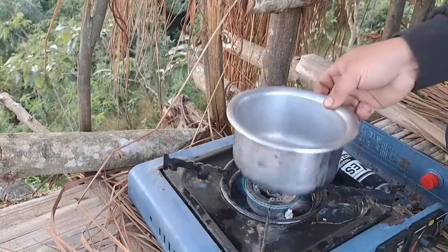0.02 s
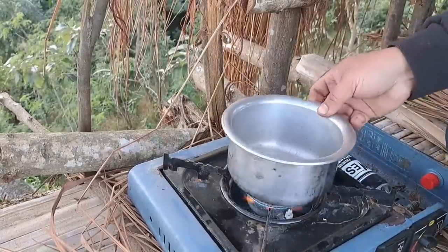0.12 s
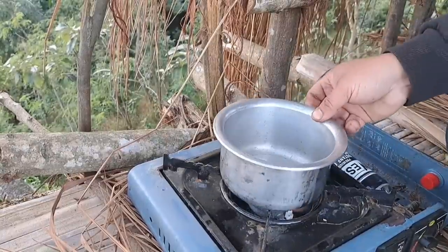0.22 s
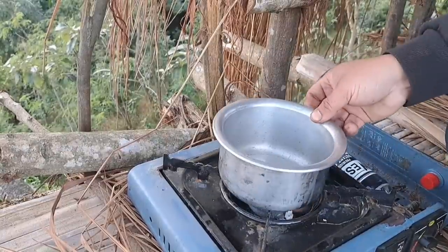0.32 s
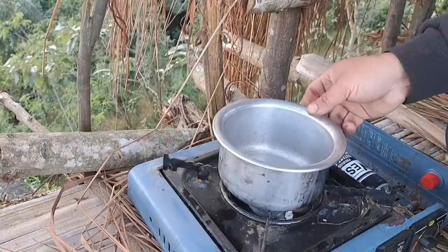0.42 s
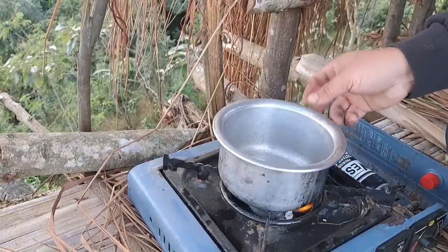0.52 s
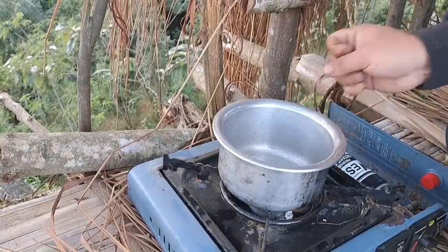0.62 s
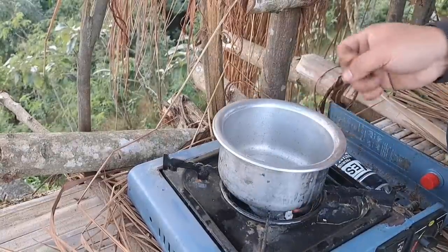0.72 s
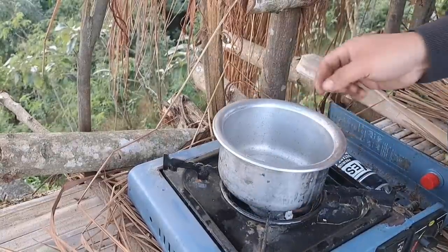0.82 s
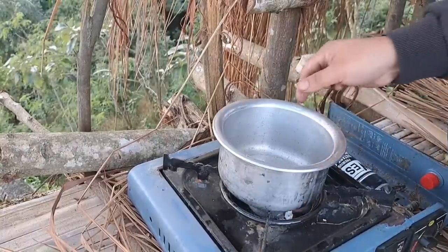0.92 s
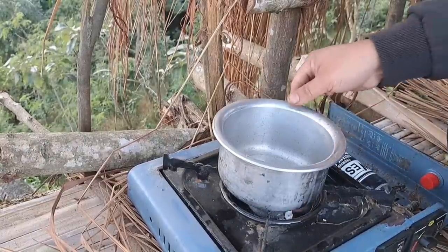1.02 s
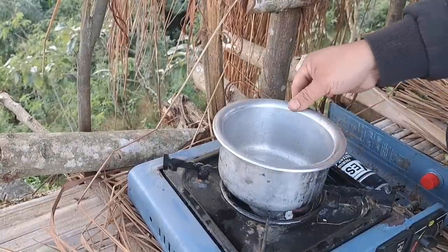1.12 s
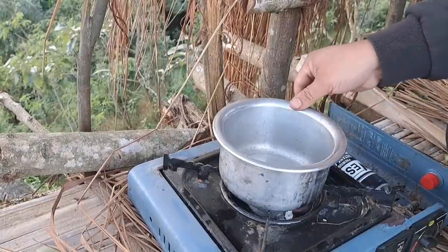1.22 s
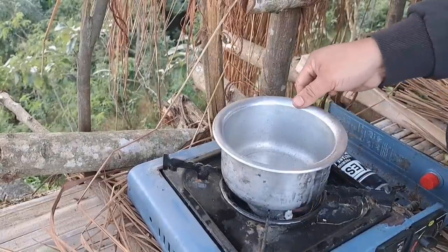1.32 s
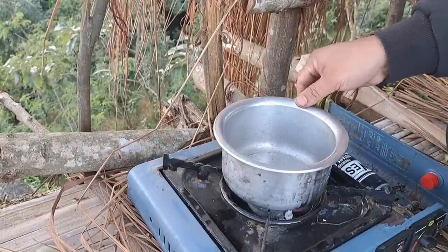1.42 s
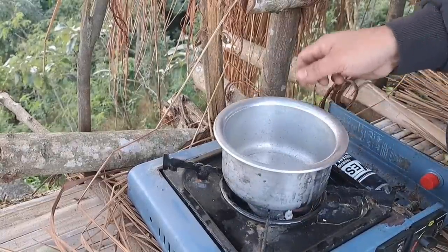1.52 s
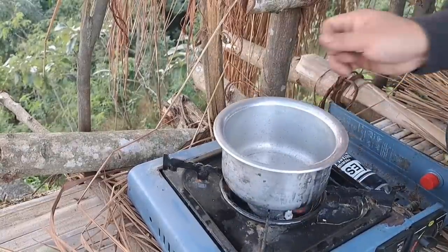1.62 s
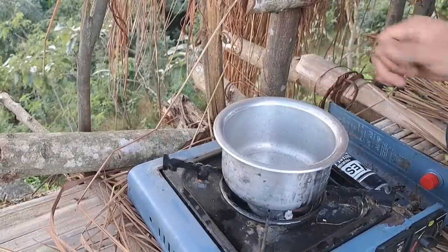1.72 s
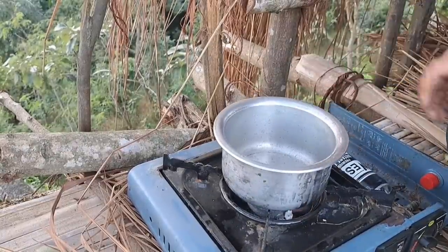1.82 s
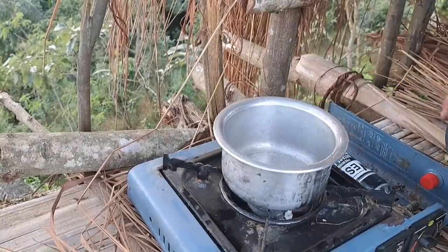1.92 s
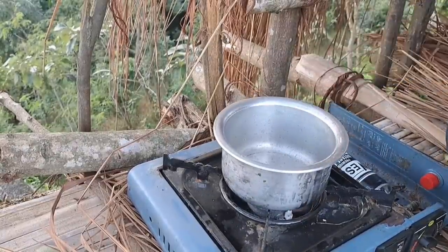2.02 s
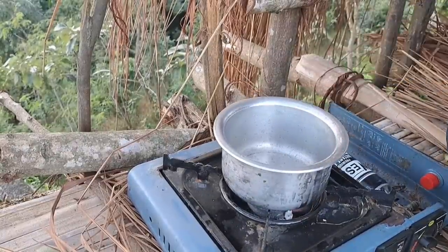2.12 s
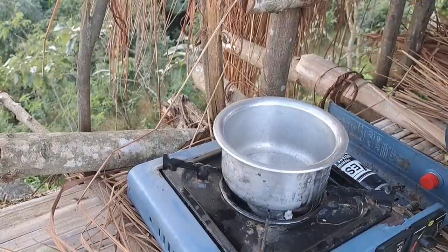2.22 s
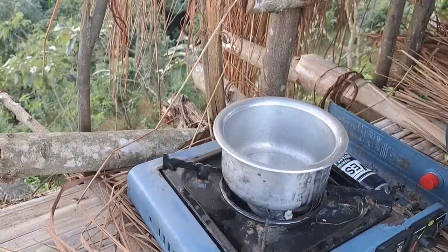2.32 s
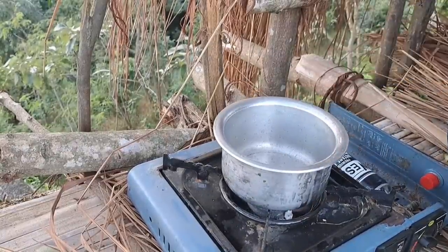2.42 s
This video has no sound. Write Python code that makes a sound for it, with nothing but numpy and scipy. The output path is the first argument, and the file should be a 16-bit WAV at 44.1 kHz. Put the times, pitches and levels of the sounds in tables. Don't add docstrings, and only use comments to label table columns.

```python
import sys
import numpy as np
from scipy import signal
from scipy.fft import rfft, irfft
from scipy.io import wavfile
from scipy.ndimage import uniform_filter1d

SR = 44100
rng = np.random.default_rng(int(sys.argv[2]) if len(sys.argv) > 2 else 0)


def put_to_file(sound):
    columns = np.atleast_2d(sound).T
    safe = np.clip(columns, -1, 1)
    whole_steps = np.round(safe * 32767)
    wavfile.write(sys.argv[1], SR, whole_steps.astype(np.int16))


def voltage_ratio(level):
    return 10 ** (np.asarray(level, float) / 20)


N = 110250


def unit(x):
    return x / np.sqrt(np.mean(x ** 2))


def curve(rows):
    return np.interp(np.arange(N) / SR, *np.array(rows).T)


def colour(x, points):
    log_hz = np.log(np.maximum(np.arange(2049) * SR / 4096, 5))
    point_hz, point_db = np.array(points).T
    log_gain = np.interp(log_hz, np.log(point_hz), point_db) * np.log(10) / 20
    cepstrum = irfft(log_gain)
    cepstrum[1:2048] *= 2
    cepstrum[2049:] = 0
    kernel = irfft(np.exp(rfft(cepstrum)))
    if x.ndim > 1:
        kernel = kernel[None]
    return signal.fftconvolve(x, kernel)[..., :x.shape[-1]]


def band(x, hz, width):
    return signal.lfilter(*signal.iirpeak(hz, hz / width, fs=SR), x)


def walk(rate):
    hold = int(SR / rate)
    steps = np.repeat(rng.standard_normal(N // hold + 1), hold)
    smooth = uniform_filter1d(uniform_filter1d(steps, hold), hold)
    return unit(smooth[:N])


def wide(alike):
    alike = np.clip(alike, 0, 1)
    mid, side = rng.standard_normal((2, N))
    return np.sqrt(1 + alike) * mid + np.sqrt(1 - alike) * side * np.array([[1], [-1]])


def pan(db):
    return voltage_ratio(np.array([[db], [-db]]) / 2)


# start in seconds, peak level in dB, contact softness in ms, left over right in dB.
HELD_CONTACTS = [(.2128, -22, 0.097, -11), (.2142, -21, 0.032, -3), (.217, -26.5, .1, 4),
                 (.2195, -28, 0.13, 2.5), (.2225, -29.5, 0.033, -14), (.229, -16, 0.1, -2),
                 (.2315, -27, 0.12, -0.5), (.2355, -23.5, 0.072, -1.5), (.241, -31, 0.065, -7),
                 (.2555, -32.5, 0.41, -4), (.276, -33, 0.09, -6), (.284, -37, .04, -13.5),
                 (.3115, -26.5, 0.18, -2.5), (.3175, -29, 0.18, -2), (.3225, -29.5, 0.18, -4),
                 (.329, -30, 0.13, -2), (.3356, -15, 0.032, -3.5), (.3375, -17, 0.047, 0),
                 (.3412, -15, 0.043, -6), (.346, -22, 0.031, -9), (.3505, -22.5, 0.083, 2.5),
                 (.3752, -10.5, 0.059, -5.5), (.3786, -9, 0.068, 0.5), (.3824, -18, 0.065, -2.5),
                 (.3855, -21, 0.074, -1.5), (.393, -19.5, 0.03, -4.5), (.4037, -17, 0.25, -2),
                 (.407, -17, .09, -1.5), (.41, -18.5, .1, -18), (.4185, -16.5, 0.049, 0.5),
                 (.4225, -22.5, 0.094, -2.5), (.427, -27, 0.24, -7.5), (.432, -24.5, 0.36, -3)]
# start in seconds, peak level in dB, contact softness in ms, left over right in dB.
FREE_CONTACTS = [(1.4745, -35, 0.32, -4), (1.479, -40, 0.21, 1), (1.486, -40.5, 0.34, -6.5),
                 (1.5111, -14.5, 0.041, -2.5), (1.5156, -13, 0.032, -3), (1.5184, -14.5, 0.032, -1),
                 (1.5227, -23, .05, -2), (1.533, -20.5, 0.039, -4.5), (1.5365, -40, .08, -2),
                 (1.54, -21.5, 0.055, 1), (1.546, -29.5, 0.047, -12), (1.552, -31, 0.038, -7.5),
                 (1.559, -38, 0.031, -8), (1.583, -27.5, 0.13, 1), (1.587, -25.5, 0.069, -6.5),
                 (1.599, -35, 0.18, -3), (1.609, -39.5, 1, -6)]
# frequency in Hz, level in dB, t60 in seconds.
HELD_MODES = [(369.3, -32, 0.21), (676, -13.5, 0.19), (839, -5.5, 0.046), (1138, -9, 0.091),
              (1200, -0.5, 0.027), (1452, 1, 0.037), (1600, 6.5, 0.04), (1896, 3.5, 0.064),
              (2089.5, 3, 0.14), (2538, -6.5, .08), (3279, 4.5, 0.049), (3510, -7.5, 0.14),
              (4286, -5, 0.084), (5300, -6.5, 0.06)]
# frequency in Hz, level in dB, t60 in seconds.
FREE_MODES = [(530, -21, 0.13), (785, -3.5, 0.097), (1114, -14, 0.069), (1200, 3, 0.073), (1474, 2.5, 0.1),
              (1584, 10, 0.033), (1700, -9, 0.04), (1895, 0.5, 0.12), (2077, -6, 0.15), (2320, -8.5, .07),
              (2597, 2.5, 0.076), (3380, -4, 0.1), (3527, -1, .1), (5387, -7.5, 0.16)]
# frequency in Hz, density in dB per Hz.
CLATTER_SPECTRUM = [(120, -37), (200, -25.5), (900, 1.5), (2030, 8.5), (4520, -5.5), (9030, -12),
                    (13700, -9), (16500, -15)]
BLOW_HZ, BLOW_DB, BLOW_T60_S = 1500, -0.5, 0.024
THUD_HZ, THUD_DB, THUD_T60_S = 231, -38.5, 0.2
CLATTER_DB, CLATTER_T60_S = 3.5, 0.027
CONTACTS_PER_S, CHATTER_S = 500, 0.0043
CRACK, CRACK_MS = 0.075, 0.073
KNOCK_LOW_HZ = 222
GRIP_S, GRIP_DB_PER_S = .435, 300


def contact_force(soft_ms, hit, sign, t):
    pushes = (hit < CONTACTS_PER_S / SR) * 0.44 * np.sign(sign) * np.exp(-(t / CHATTER_S) ** 2)
    pushes[0] = 1
    pole = np.exp(-1000 / (max(soft_ms, .01) * SR))
    rounded = signal.lfilter([(1 - pole) ** 2], [1, -2 * pole, pole ** 2], pushes)
    return CRACK / (1 + (soft_ms / CRACK_MS) ** 2) * pushes + rounded


def pot_ring(modes, chance, t):
    ring = 0
    for (hz, db, t60), (lift, lean, detune) in zip(modes, chance):
        level = db + 1.88 * lift + 2.3 * lean * np.array([[1], [-1]]) - 60 * t / t60
        ring = ring + voltage_ratio(level) * np.sin(2 * np.pi * hz * (1 + 0.00052 * detune) * t)
    return ring


def knocks():
    size = 8192
    out = np.zeros((2, N + size))
    t = np.arange(size) / SR
    no_bass = signal.butter(2, KNOCK_LOW_HZ, "high", fs=SR, output="sos")
    thud = np.sin(2 * np.pi * THUD_HZ * t) * voltage_ratio(THUD_DB - 60 * t / THUD_T60_S)
    for contacts, modes in ((HELD_CONTACTS, HELD_MODES), (FREE_CONTACTS, FREE_MODES)):
        for s, db, soft_ms, lr in contacts:
            hit = rng.random(size)
            noise = rng.standard_normal((2, size))
            chance = rng.standard_normal((len(modes) + 1, 3))
            force = contact_force(soft_ms, hit, noise[0], t)
            ring = pot_ring(modes, chance, t)
            blow_hz = BLOW_HZ * (1 + 0.15 * chance[-1, 0])
            blow = np.sin(2 * np.pi * blow_hz * t) * voltage_ratio(BLOW_DB - 60 * t / BLOW_T60_S)
            clatter = colour(noise * voltage_ratio(-60 * t / CLATTER_T60_S), CLATTER_SPECTRUM)
            clatter = clatter.mean(0) + 1.93 * band(clatter, 8800, 13000)
            body = ring / 4 + blow + voltage_ratio(CLATTER_DB) * clatter + thud
            sound = signal.fftconvolve(body, force[None])[:, :size]
            sound = signal.sosfilt(no_bass, sound)
            at = int(s * SR)
            out[:, at:at + size] += voltage_ratio(db) * pan(lr) * sound / np.abs(sound).max()
    late = np.arange(N) / SR - GRIP_S
    gripped = (late > 0) * (late < .5)
    return out[:, :N] * voltage_ratio(-GRIP_DB_PER_S * late * gripped)


# start in seconds, peak level in dB, pitch in Hz, t60 in seconds.
SMALL_TAPS = [(0.243, -48, 73.6, 0.16), (1.213, -54, 54.7, 0.21), (0.505, -39, 967, 0.061),
              (0.72, -62, 904, 0.024), (0.698, -62, 1500, 0.018), (.577, -53, 1500, 0.021),
              (.61, -60, 1290, 0.018), (1.003, -51.5, 1500, 0.022), (1.756, -64, 933, 0.019),
              (1.215, -56, 3150, 0.019), (1.222, -49, 7250, 0.022), (1.232, -45, 975, 0.046),
              (1.255, -46.5, 670, 0.038), (1.371, -46.5, 1142, 0.097), (1.653, -54, 5300, 0.012),
              (2.034, -52, 1360, 0.021), (2.097, -69, 1200, 0.022), (2.255, -49, 2520, 0.019),
              (2.2565, -59, 6400, .015), (2.288, -46, 1830, 0.03), (2.2875, -58, 5020, .015),
              (2.377, -36, 315, 0.025), (2.379, -54.5, 1270, 0.025), (2.463, -43, 450, 0.023)]
TAP_WIDTH, TAP_RISE_S = 0.53, 0.00063


def taps():
    size = 4096
    out, t = np.zeros((2, N + size)), np.arange(size) / SR
    for s, db, hz, t60 in SMALL_TAPS:
        tone = np.sin(2 * np.pi * hz * t)
        width = TAP_WIDTH * hz
        noise = unit(band(band(wide(0.62)[:, :size], hz, width), hz, width))
        envelope = (1 - np.exp(-t / TAP_RISE_S)) * voltage_ratio(-60 * t / t60)
        at = int(s * SR)
        out[:, at:at + size] += voltage_ratio(db) * envelope * (0.73 * tone + 0.48 * noise)
    return out[:, :N] * pan(-1.5)


# start in seconds, length in seconds, level in dB, dry hiss in dB relative to the ring.
DRAGS = [
    (0.224, 0.044, -42, -16.5),
    (0.258, 0.082, -44, -11.5),
    (1.359, 0.13, -61.5, -16),
    (1.448, 0.066, -53.5, -17),
]


def scrape():
    t = np.arange(N) / SR
    grain_db = np.minimum(rng.exponential(size=N), 4)
    grit = wide(0.45) * voltage_ratio(grain_db + 3.3 * walk(170))
    ring = unit(sum(voltage_ratio(.3 * db) * band(grit, hz, 8 / t60) for hz, db, t60 in HELD_MODES))
    air = unit(colour(grit, RUSTLE_SPECTRUM))
    out = 0
    for s, length, db, air_db in DRAGS:
        swell = np.sin(np.pi * np.clip((t - s) / length, 0, 1)).clip(0) ** 0.55
        out = out + voltage_ratio(db) * swell * (ring + voltage_ratio(air_db) * air)
    return pan(-0.7) * out


# time in seconds, level
# in dB.
FLAME_LEVEL = [(0, -59.5), (.12, -62.5), (.17, -53.5), (.25, -49.5), (.4, -48), (.5, -50.5), (.63, -54),
               (.68, -53), (.95, -54), (1.22, -51.5), (1.34, -54.5), (1.47, -51), (1.7, -54), (1.9, -52),
               (2.12, -52), (2.24, -53.5), (2.32, -50.5), (2.5, -56.5)]
# frequency in Hz, density in dB per Hz.
FLUTTER_SPECTRUM = [(15, -55), (25, -20), (86, -11), (140, 0.5), (273, -1.5), (320, -7), (566, -10),
                    (827, -37.5), (1100, -31.5), (1430, -41.5), (2420, -120)]
# frequency in Hz, density in dB per Hz.
HISS_SPECTRUM = [(470, -29.5), (800, -21), (1420, 5.5), (3210, -16.5), (3910, -19), (5470, -4.5),
                 (15500, -12.5)]
# frequency in Hz, width in Hz, level in dB.
BURNER_MODES = [(985, 96, -85.5), (1438, 180, -81), (2800, 99, -83), (3208, 300, -79), (4770, 240, -78.5),
                (5400, 380, -75.5), (7270, 420, -75.5), (12600, 2200, -76)]
PUFF_DB, PUFFS_PER_S, FLICKER_DB = 2, 34, 1.3
FLAME_BODY_HZ, FLAME_BRIGHTENS = 322, 1
HISS_DB, HISS_FOLLOWS = -77.5, 1
SHADED_UNTIL_S, SHADE_DB, SHADE_HZ = .21, -7, 3050


def flame():
    level, puff = curve(FLAME_LEVEL), walk(PUFFS_PER_S)
    flutter = colour(wide(0.93), FLUTTER_SPECTRUM)
    low = 0
    for hz in 30 * 2 ** np.arange(0, 5.2, 1 / 3):
        tilt = np.log2(1 + (hz / FLAME_BODY_HZ) ** 2) / 2
        patch_db = PUFF_DB * puff + FLICKER_DB * walk(8.7) + FLAME_BRIGHTENS * (level + 56.5) * tilt
        low = low + band(flutter, hz, hz / 4) * voltage_ratio(patch_db)
    hiss = voltage_ratio(HISS_DB + 0.52 * (level + 61.5)) * unit(colour(wide(.4), HISS_SPECTRUM))
    air = wide(0.14)
    for hz, width, db in BURNER_MODES:
        follow_db = (HISS_FOLLOWS * (level + 56) + 0.4 * puff) / (1 + (hz / 4000) ** 2)
        resonance = unit(band(band(air, hz, width), hz, 2 * width))
        hiss = hiss + voltage_ratio(db + 1.2 * walk(5.3) + follow_db) * resonance
    shaded = np.arange(N) < SHADED_UNTIL_S * SR
    hiss = hiss - (1 - voltage_ratio(SHADE_DB)) * shaded * band(hiss, SHADE_HZ, 1900)
    return unit(low) * voltage_ratio(level) * pan(-0.34) + hiss * pan(-1.64)


SPUTTER_DB, SPUTTER_HZ, SPUTTERS_PER_S = -76, 1800, 60


def sputter():
    ticks = (rng.random(N) < SPUTTERS_PER_S / SR) * np.minimum(rng.exponential(size=N), 2.5)
    ticks = signal.lfilter([1], [1, -.985], ticks) * wide(0.72) * voltage_ratio(curve(FLAME_LEVEL) + 53)
    return voltage_ratio(SPUTTER_DB) * unit(band(ticks, SPUTTER_HZ, 3600)) * pan(-2)


# time in seconds, level in dB.
SLEEVE_LEVEL = [(1.3, -103), (1.47, -58), (1.6, -67.5), (1.84, -84), (1.89, -62.5), (2.1, -57),
                (2.19, -61.5), (2.22, -67.5), (2.29, -62), (2.42, -65.5), (2.5, -77.5)]
# frequency in Hz, density in dB per Hz.
RUSTLE_SPECTRUM = [(470, -53), (800, -29.5), (1420, -8.5), (3050, -13.5), (4770, -4.5), (8980, -11),
                   (12600, -6), (15500, -11.5)]
CRACKLE_DB, CRACKLE_HZ, CRACKLES_PER_S = -9.5, 1419, 160


def sleeve():
    grains = wide(0.22) * voltage_ratio(2 * rng.exponential(size=N))
    snaps = (rng.random(N) < CRACKLES_PER_S / SR) * rng.standard_normal(N)
    bursts = signal.lfilter([1], [1, -.99], np.minimum(np.abs(snaps), 1))
    crackle = band(bursts * wide(0.7), CRACKLE_HZ, 1373)
    rustle = unit(colour(grains, RUSTLE_SPECTRUM)) + voltage_ratio(CRACKLE_DB) * unit(crackle)
    return rustle * voltage_ratio(curve(SLEEVE_LEVEL)) * pan(-8.5)


# start in seconds, length in seconds, start pitch in Hz, end pitch in Hz, level in dB.
INSECT_CALLS = [
    (.83, .08, 11500, 10800, -72.5),
    (0.885, 0.052, 14000, 12900, -70),
    (1.977, 0.0089, 4740, 4700, -51.5),
    (2.3, 0.055, 14500, 14000, -70),
    (2.325, 0.052, 4270, 4400, -67.5),
]
SWARM_S, SWARM_LENGTH_S, SWARM_DB, CHIRP_S = 2.22, 0.52, -71, 0.021
SWARM_HZ, SWARM_SPREAD_HZ = 12900, 1200


def swarm_chirps(count):
    chirps = []
    for k, (a, b, d, e, g) in enumerate(rng.random(size=(count, 5))):
        start = SWARM_S + SWARM_LENGTH_S * (k + a) / count
        hz = SWARM_HZ + SWARM_SPREAD_HZ * (d + e - 1) * 2
        chirps.append((start, CHIRP_S * (.5 + b), hz, hz + 900 * (g - .5), SWARM_DB + 6 * (b - a)))
    return chirps


def insects():
    out = np.zeros(N + SR)
    swarm = swarm_chirps(110)
    waver, flutter = walk(120), walk(140)
    for s, length, hz0, hz1, db in list(INSECT_CALLS) + swarm:
        u = np.arange(int(length * SR)) / (length * SR)
        shift = rng.integers(N // 2)
        part = slice(shift, shift + len(u))
        hz = (hz0 + (hz1 - hz0) * u) * (1 + 0.0022 * waver[part])
        tone = np.sin(2 * np.pi * np.cumsum(hz) / SR)
        at = int(s * SR)
        out[at:at + len(u)] += voltage_ratio(db + 2.6 * flutter[part]) * np.sin(np.pi * u) * tone
    return out[:N] * pan(-3)


ECHO_DB, ECHO_T60_S = -9.5, 0.12
TOP_HZ = 15650


def echoes(dry_pot):
    t = np.arange(8192) / SR
    echo = wide(1)[:, :len(t)] * voltage_ratio(-60 * t / ECHO_T60_S) * (t > .002)
    echo = voltage_ratio(ECHO_DB) * echo / np.sqrt((echo ** 2).sum(1, keepdims=True))
    return signal.fftconvolve(dry_pot, echo, axes=1)[:, :N]


def scene():
    pot = knocks() + taps()
    steady = flame() + sleeve() + insects() + scrape() + sputter()
    mix = pot + echoes(pot) + steady
    return signal.sosfilt(signal.ellip(10, .2, 30, TOP_HZ, fs=SR, output="sos"), mix)


def low_pass(x):
    return signal.sosfilt(signal.butter(12, 16660, fs=SR, output="sos"), x)


def record(dry):
    mix = np.array([np.roll(dry[0], 1), dry[1]])
    return low_pass(mix)


dry = scene()
out = record(dry)
put_to_file(out)
```